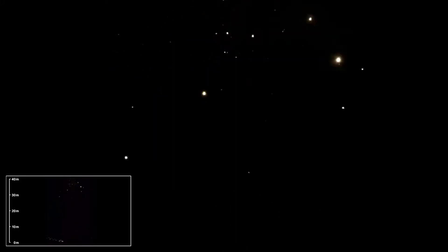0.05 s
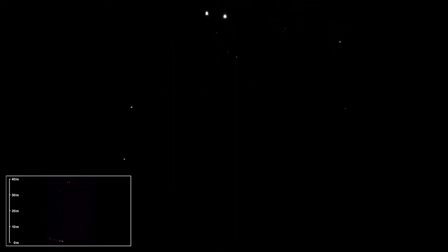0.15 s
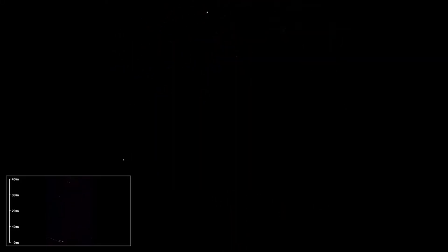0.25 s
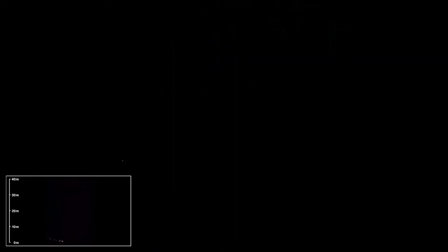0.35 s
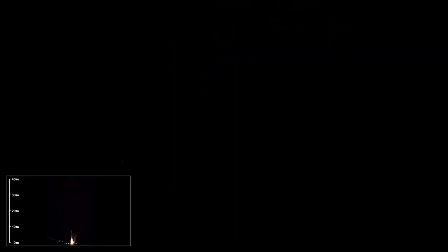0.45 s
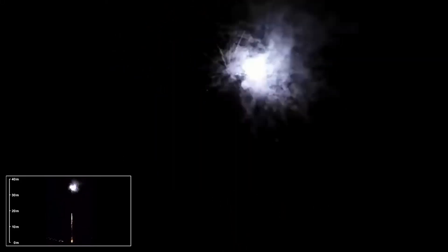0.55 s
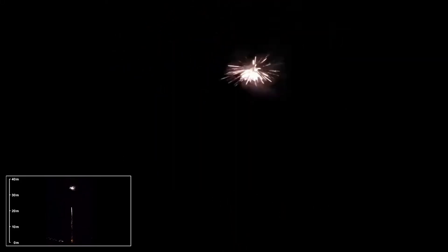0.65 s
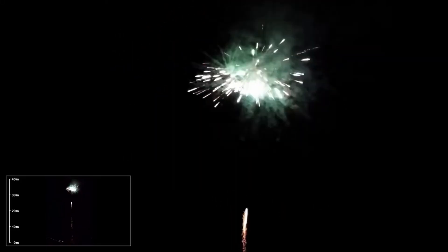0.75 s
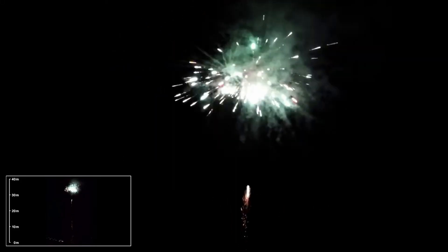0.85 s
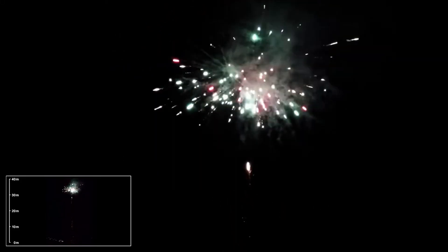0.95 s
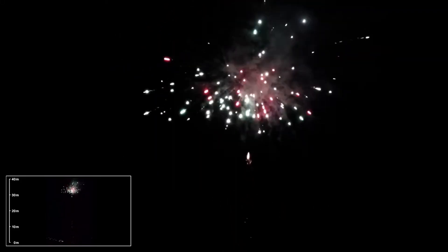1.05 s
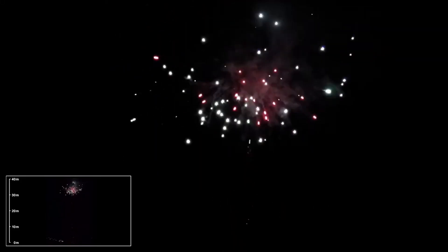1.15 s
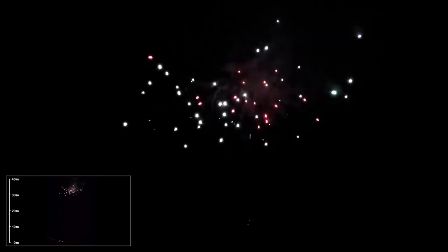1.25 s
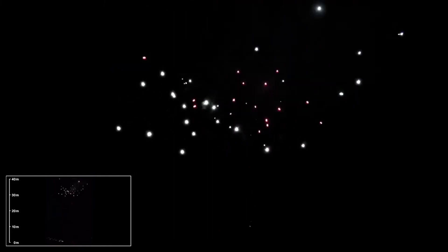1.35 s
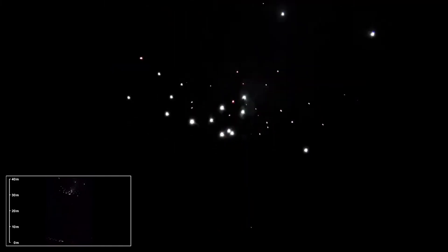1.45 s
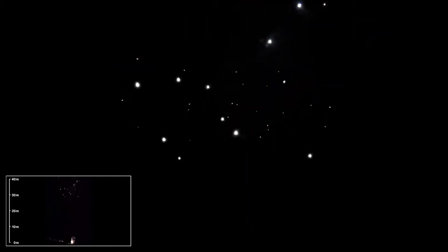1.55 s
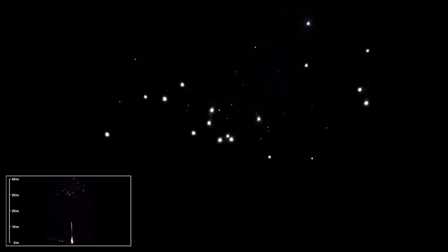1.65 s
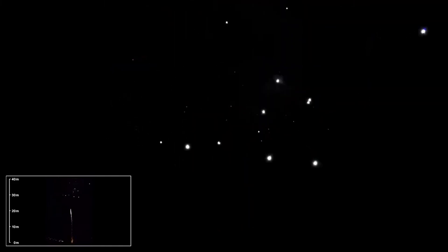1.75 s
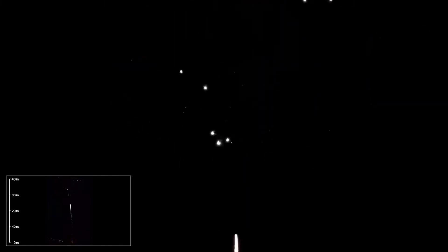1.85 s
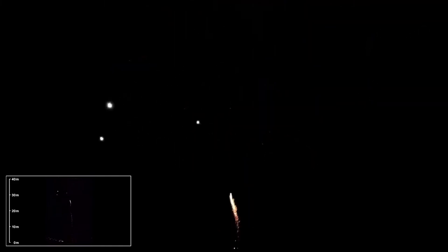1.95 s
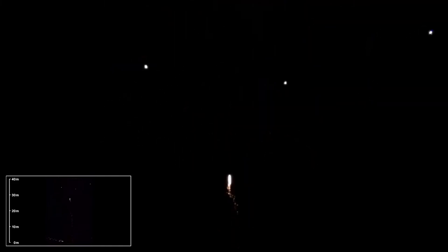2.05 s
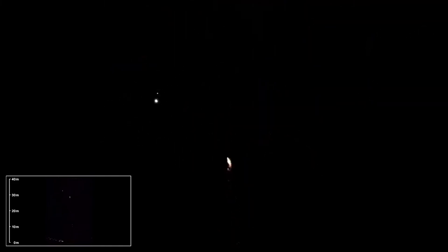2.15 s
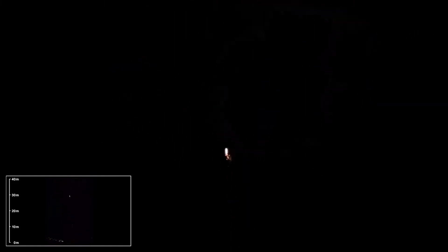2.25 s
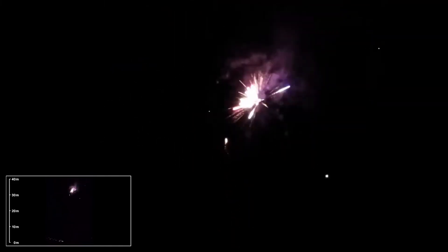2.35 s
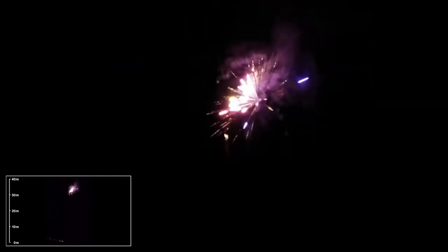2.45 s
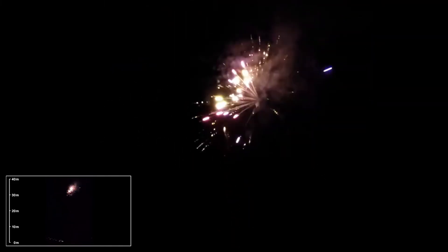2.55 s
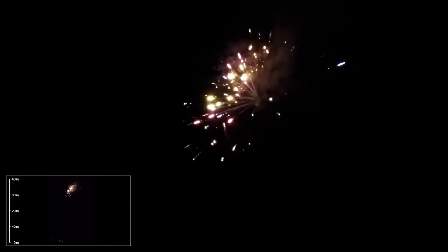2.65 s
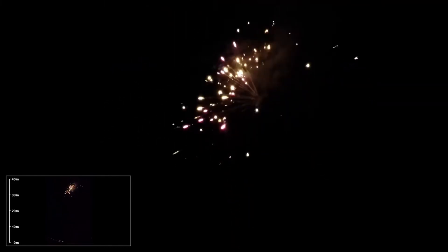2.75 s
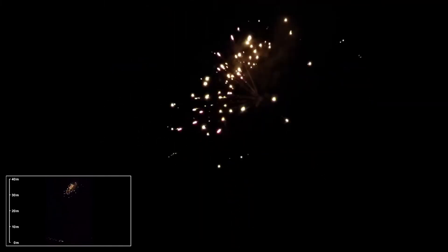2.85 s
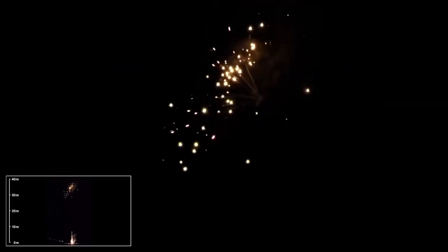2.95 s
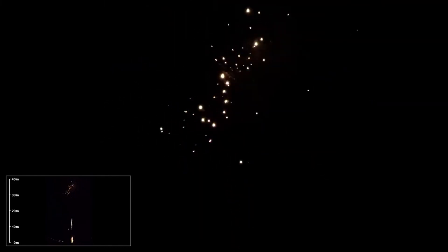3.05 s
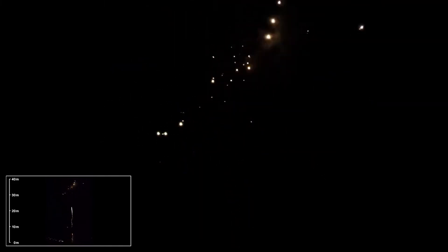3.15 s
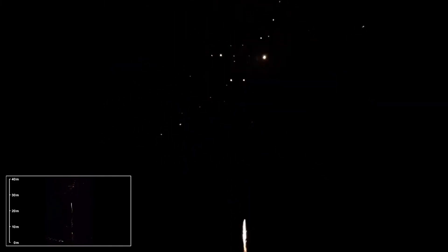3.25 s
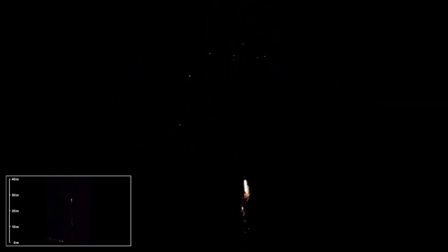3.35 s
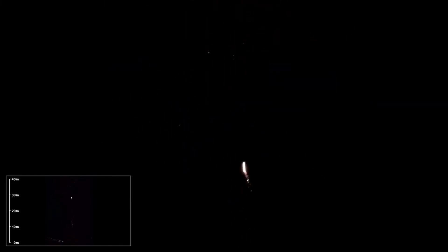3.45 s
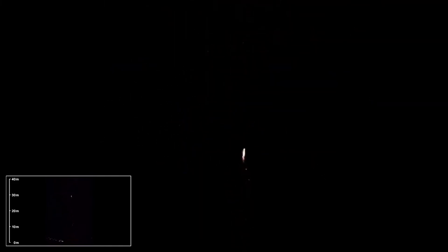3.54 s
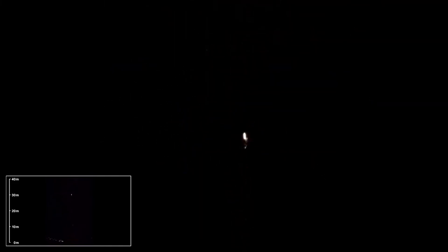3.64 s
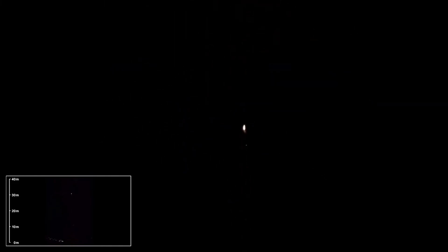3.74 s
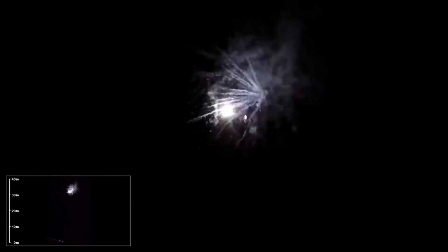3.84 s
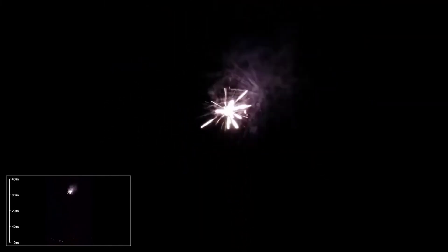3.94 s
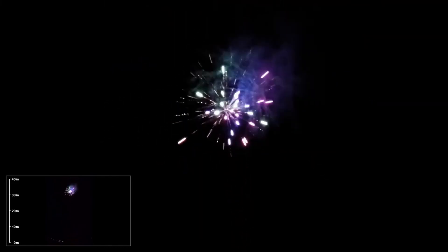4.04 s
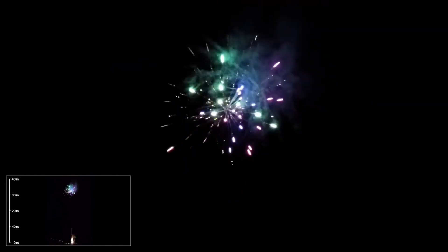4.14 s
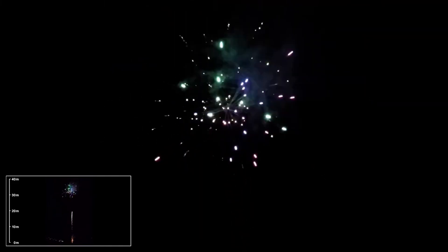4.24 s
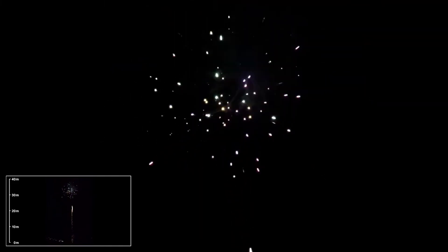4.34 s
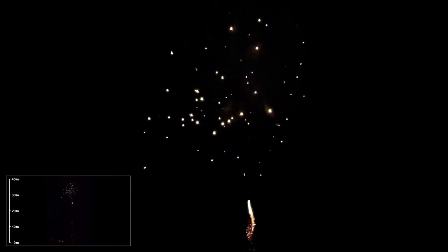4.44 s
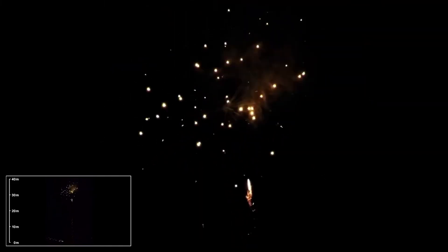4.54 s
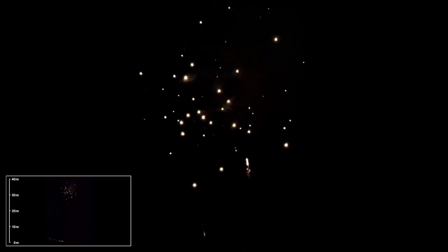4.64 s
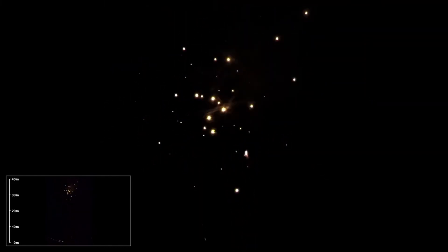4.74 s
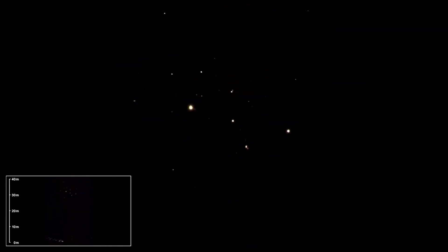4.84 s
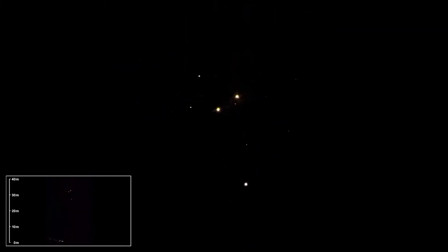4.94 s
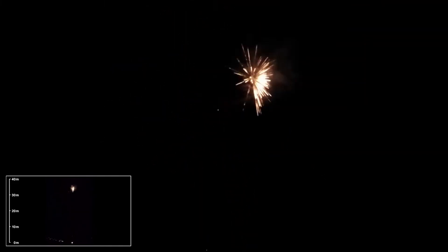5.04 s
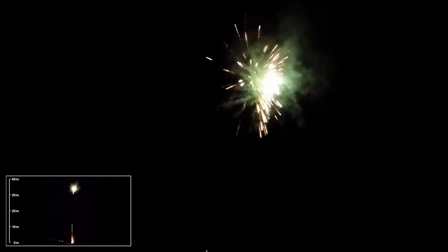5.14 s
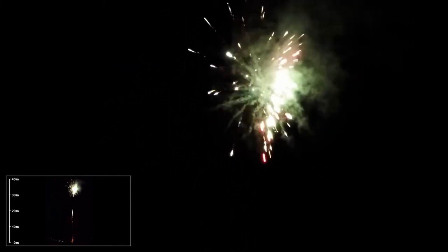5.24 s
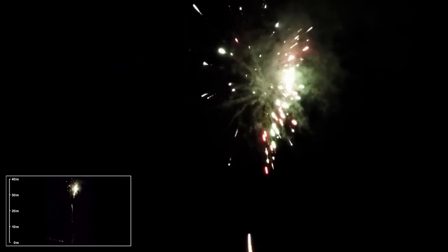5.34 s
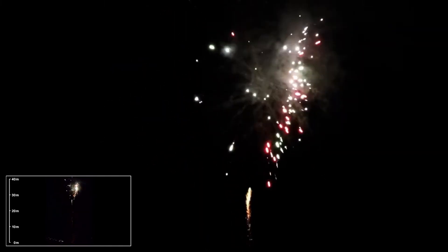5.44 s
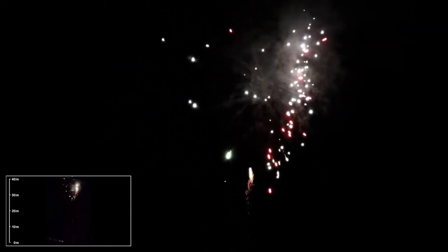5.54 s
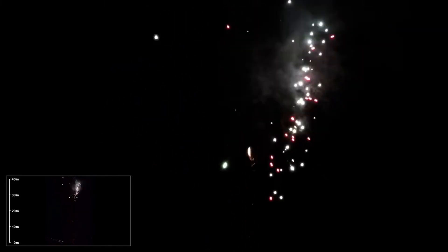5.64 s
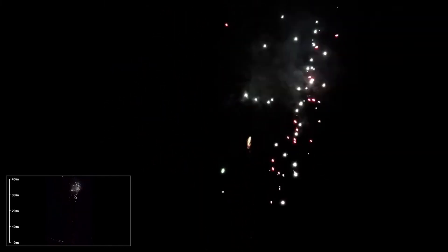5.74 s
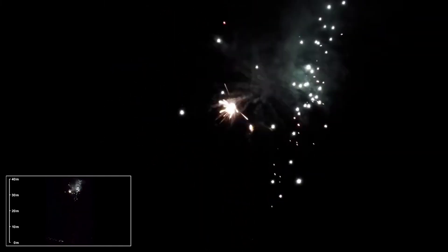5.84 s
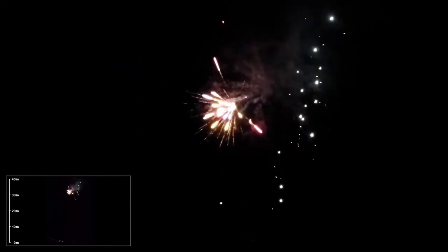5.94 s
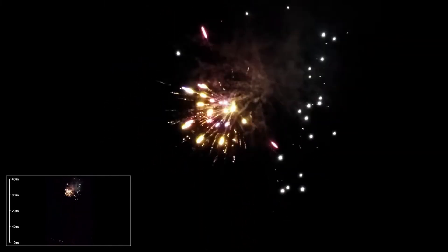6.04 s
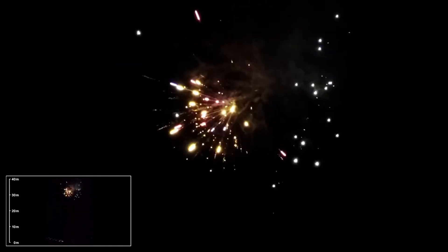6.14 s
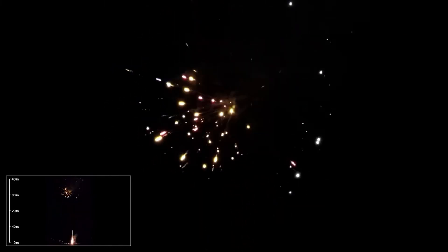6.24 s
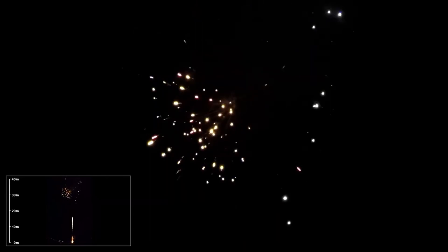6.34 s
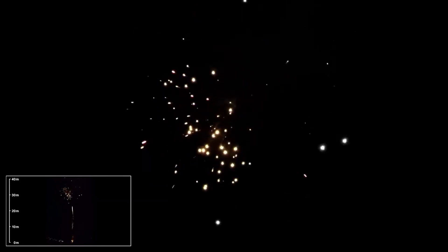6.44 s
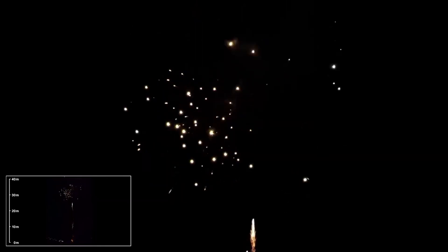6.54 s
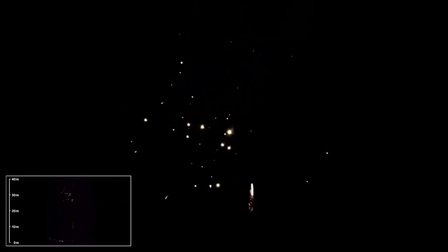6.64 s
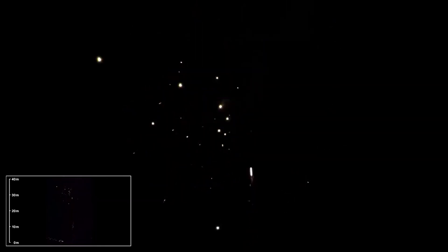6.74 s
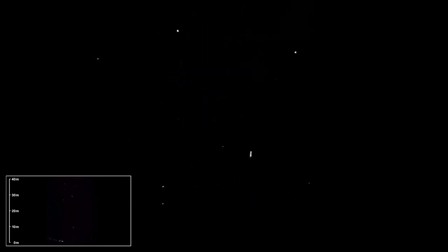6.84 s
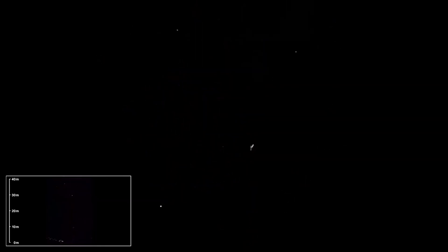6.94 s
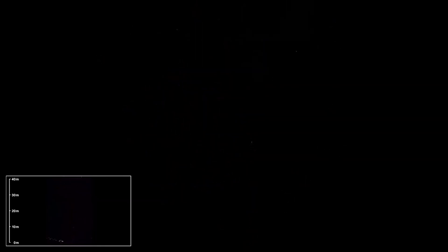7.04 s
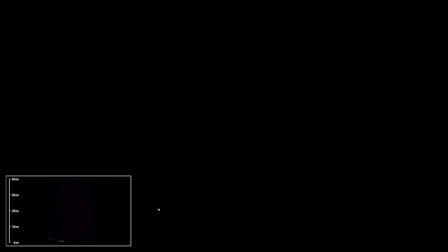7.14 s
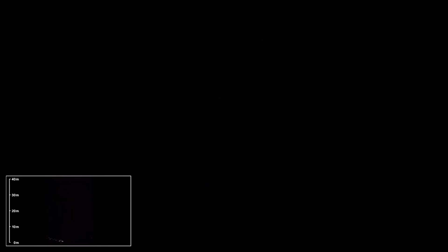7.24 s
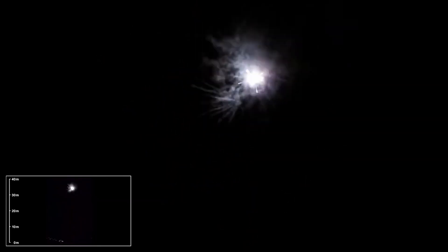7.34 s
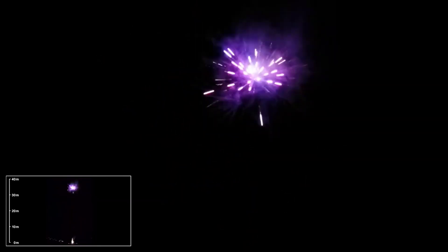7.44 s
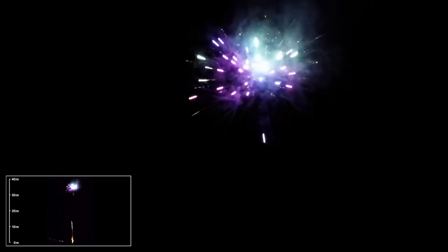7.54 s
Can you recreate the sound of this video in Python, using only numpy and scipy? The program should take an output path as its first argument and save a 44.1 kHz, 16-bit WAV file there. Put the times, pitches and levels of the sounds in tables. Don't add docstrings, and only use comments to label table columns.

```python
import sys
import numpy as np
from scipy import signal
from scipy.fft import rfft, irfft
from scipy.io import wavfile
from scipy.ndimage import uniform_filter1d

SR = 44100
rng = np.random.default_rng(int(sys.argv[2]) if len(sys.argv) > 2 else 0)


def to_wav(s):
    ch = np.atleast_2d(s).T
    pcm = np.round(np.clip(ch, -1, 1) * 32767)
    wavfile.write(sys.argv[1], SR, pcm.astype(np.int16))


def volts(x):
    e = np.asarray(x, float) / 20
    return 10 ** e


N = 334719

# (time [s], ring level [dB], pressure swing level [dB], swing time [ms], swing damping)
LIFTS = [
    (0.50029, 21.2, 29.5, 2.23, 0.91),
    (1.65682, 18.7, 25.4, 2.57, 1.16),
    (3.02992, 18.8, 27.2, 3.04, 1.66),
    (4.17413, 18.0, 21.4, 4.44, 1.3),
    (5.15682, 15.4, 19.0, 3.12, 1.25),
    (6.30667, 13.8, 21.0, 4.21, 1.37),
    (7.54065, 13.9, 21.8, 4.33, 1.43),
]
# (time [s], ring level [dB], pressure swing level [dB], swing time [ms], swing damping)
BURSTS = [
    (0.78742, 18.5, 14.2, 4.39, 1.23),
    (2.46665, 23.5, 16.5, 2.79, 0.77),
    (4.06855, 22.2, 14.6, 2.8, 0.77),
    (5.17317, 17.9, 16.0, 3.82, 1.34),
    (6.00549, 19.9, 14.5, 2.6, 0.8),
    (7.53007, 19.9, 8.1, 3.05, 0.6),
]
# (pitch [Hz], decay [ms], start angle [rad], share)
LIFT_RING = (839, 1.951, -1.475, .557, 1.029, -.62), (195.5, 1.5, 3.53, 1)
BURST_RING = (780, 2.287, -1.389, 2.76, 2.152, -.135), (226, 2.425, 3.185, .606)
# (pitch [Hz], level under the ring [dB], decay [ms])
PORT = [(1120, -8, 0.16), (3940, -25, 0.99), (7610, -21.5, 1.0), (10535, -17, 0.6), (14470, -35, 0.49)]
LIFT_FRONT_DB, BURST_FRONT_DB = -1, -16
# (pitch [Hz], width [Hz], level under the ring [dB], t60 [s])
NEAR_SCATTER = [(131, 84, -54.5, 0.23), (458.4, 92, -34.5, 0.077), (716, 290, -31.5, 0.07),
                (1406, 440, -34.5, 0.04), (2175, 2700, -48, 0.1), (3390, 730, -29, 0.017),
                (6960, 6000, -51, 0.056)]

WALL_DB = (-3, -3, -7, -11, -6, -8)
WALL_LAG_MS = 235.05
# (lag [s], level under the wall echo [dB], pitch [Hz], width [Hz])
CLICKS = [(.055, -33, 4000, 2200), (.0555, -39, 8500, 6000), (.0785, -35.5, 4000, 2000),
          (.093, -36, 4200, 1600), (.107, -36, 3600, 2500), (.1313, -34, 3000, 900),
          (.1325, -44, 6500, 5000), (.1995, -45, 5500, 1800), (.2165, -44, 11500, 2500),
          (.2325, -34, 2600, 500), (.233, -34, 4100, 900), (.2335, -42, 10500, 3000),
          (.293, -40.5, 3800, 4800), (.3115, -33, 2300, 1400), (.366, -39, 4500, 5000),
          (.4415, -41.5, 3800, 1000), (.5795, -43, 2600, 1700), (.6055, -33, 2700, 2600)]
CLICK_T60_S = .0085
# (lag [s], level under the wall echo [dB], pitch [Hz], t60 [s])
THUDS = [(0.0596, -27.5, 292, .01), (0.1045, -30, 1440, 0.065), (.119, -28, 574, 0.017),
         (0.152, -39, 740, 0.018), (.181, -53, 550, 0.0088), (.222, -23, 454, 0.067),
         (0.241, -18.5, 547, 0.063), (.27, -16, 430, .016), (.298, -21.5, 647, 0.038),
         (0.385, -23.5, 278, 0.034), (.405, -25, 730, 0.0074)]
THUD_WIDTH = 0.52

# (time [s], peak level [dB])
ROOFS = (0.11, -10.5, -32.5), [(.345, -15), (.874, -14.5), (2.551, -8), (4.154, -8.5), (5.26, -14.5),
         (6.093, -5)]
TREES = (0.043, -4.5, -38), [(.945, -9.5), (.968, -12), (2.633, -4.5), (2.649, -5.5), (4.231, -14),
         (4.26, -14.5), (5.33, -10), (5.349, -14), (6.171, -2)]
FENCES = (0.16, -6, -17.5), [(2.591, -12), (2.679, -11), (2.78, -20), (6.154, -30), (6.218, -6.5),
          (6.28, -33)]
BARNS = (0.2, -9, -26), [(.193, -13.5), (1.069, -14.5), (1.205, -14.5), (2.753, -12.5), (2.885, -13),
         (2.92, -16)]
HILL = (0.087, -5, -35), [(.116, -10.5), (1.561, -11.5), (4.82, -21.5), (5.945, -15)]
RAGGED_DB = 3.2

ROAR_EDGES_HZ = (25, 350, 1150, 2300, 3200, 6500, 15800)
# (frequency [Hz], level per Hz [dB])
ROAR_COLOUR = [(22, -17), (60, -8), (200, -10), (420, -3), (520, 0), (820, -0.5), (1000, -10), (1400, -22),
               (2200, -32.5), (3100, -37), (4300, -38), (5500, -48), (10500, -54.5), (15500, -61.5)]
ROAR_GRAIN_DB = (3.1, 1.77, 1.5, 1.5, 1.63, 1.6)
CRACKLE_DB, SWELL_DB = 1.5, 1.3
HISS_DB = -74
# (lag [s], level [dB])
LIFT_FIELD = [(.04, -35), (.17, -42), (.23, -31.5), (.4, -34), (.65, -39), (.9, -36), (1.08, -32),
              (1.25, -36.5), (1.8, -54)]
# (lag [s], level [dB])
BURST_FIELD = [(.04, -30.5), (.1, -37), (.17, -20), (.22, -28), (.33, -27.5), (.55, -34.5), (.9, -43.5),
               (1.08, -40.5), (1.8, -62.5)]
# (lag [s], level [dB])
BURST_LEAVES = [(.04, -27), (.09, -33), (.13, -22.5), (.18, -21.5), (.26, -27), (.38, -28), (.6, -35.5),
                (1.0, -33.5), (1.8, -51)]
LEAVES_FROM_BAND = 2
# (offset after a lift [dB], offset after a burst [dB], loss per second of travel [dB/s],
# loss past the near trees [dB], night floor [dB])
FIELD_BANDS = [(-0.5, -6, 3, 0.7, -44.5), (1.03, 0.35, -0.28, 0, -37), (-12, -18.5, 5, -0.5, -51),
               (-21.5, -26.5, 1.15, 2.3, -72.5), (-16, -19.5, 12.5, 1.5, -72.5),
               (-19.5, -23.5, 42, 2.5, -90)]
NEAR_TREES_END_S = 0.375
EARLIER_LIFT_S, EARLIER_BURST_S, EARLIER_DB = -.67, -.655, 2.5

DUCK_DB = (-.5, 1.5, -3.5, -4.5, -2, 0, -4.5, 0, -10.5, -15, -5.5, 0.5, -6, -12, -2)
RECOVER_S = 1.92
QUICK_DUCK_DB, QUICK_RECOVER_S = -4, 0.18
LOOK_AHEAD_S, LOOK_AHEAD_DB = 0.036, -5.5
ECHO_TOP_HZ, TOP_HZ = 15100, 16200
# (from [Hz], to [Hz], gate level [dB])
TOP_BANDS = [(11900, 12700, -95), (12700, 13400, -92.5), (13400, 14300, -90), (14300, 16500, -87)]


def band(x, hz, width_hz):
    half = width_hz / 2
    high = min(np.sqrt(hz ** 2 + half ** 2) + half, 20000.)
    sos = signal.butter(2, [hz ** 2 / high, high], "bandpass", fs=SR, output="sos")
    y = signal.sosfilt(sos, x)
    return y / np.sqrt(np.mean(y ** 2))


def cut(x, hz):
    return signal.sosfiltfilt(signal.ellip(8, .1, 50, hz, fs=SR, output="sos"), x)


def add(out, s, sound):
    i = int(round(s * SR))
    n = max(min(len(sound), len(out) - i), 0)
    out[i:i + n] += sound[:n]


def uneven(count, hold):
    steps = np.repeat(rng.standard_normal(count // hold + 1), hold)[:count]
    return 1.2 * uniform_filter1d(steps, size=hold)


def puff(hz, width_hz, t60_s, rise_s, count, lumps=1):
    t = np.arange(count) / SR
    noise = band(rng.standard_normal(count + 2048), hz, width_hz)[2048:]
    return lumps * noise * (1 - np.exp(-t / rise_s)) * volts(-60 * t / t60_s)


def field_gains():
    t = np.arange(0, N, 32) / SR
    lift_times = (EARLIER_LIFT_S, *np.transpose(LIFTS)[0])
    burst_times = (EARLIER_BURST_S, *np.transpose(BURSTS)[0])
    fired = sorted([(s, False) for s in lift_times] + [(s, True) for s in burst_times])
    power = [volts(2 * row[-1]) + 0 * t for row in FIELD_BANDS]
    gain_db = 0 * t
    for (s, burst), duck_db in zip(fired, DUCK_DB):
        lag = np.maximum(t - s, 0)
        far = np.clip((lag - NEAR_TREES_END_S) / 0.024, 0, 1)
        for k, (lift_db, burst_db, loss_db, far_db, _) in enumerate(FIELD_BANDS):
            if burst:
                field = BURST_FIELD if k < LEAVES_FROM_BAND else BURST_LEAVES
            else:
                field = LIFT_FIELD
            db = np.interp(lag, *np.transpose(field)) + (burst_db if burst else lift_db)
            db = db + EARLIER_DB * (s < 0)
            power[k] = power[k] + (t > s) * volts(2 * (db - loss_db * lag - far_db * far))
        slow_duck = duck_db * np.exp(-lag / RECOVER_S)
        quick_duck = QUICK_DUCK_DB * np.exp(-lag / QUICK_RECOVER_S)
        closing = np.clip(1 + np.minimum(t - s, 0) / LOOK_AHEAD_S, 0, 1)
        gain_db = np.where(t > s, slow_duck + quick_duck, gain_db + LOOK_AHEAD_DB * closing)
    return [np.interp(np.arange(N) / SR, t, v) for v in (*np.sqrt(power), volts(gain_db))]


def roar():
    grains = uneven(N, hold=200)
    grit = volts(CRACKLE_DB * uneven(N, hold=48))
    hz = np.maximum(np.arange(N // 2 + 1) * SR / N, 1)
    colour_hz, colour_db = np.transpose(ROAR_COLOUR)
    colour = volts(np.interp(np.log(hz), np.log(colour_hz), colour_db))
    out = volts(HISS_DB) * rng.standard_normal(N)
    *sizes, gain = field_gains()
    for lo, hi, size, grain_db in zip(ROAR_EDGES_HZ, ROAR_EDGES_HZ[1:], sizes, ROAR_GRAIN_DB):
        grainy = rng.standard_normal(N) * volts(grain_db * grains)
        if lo > 1000:
            grainy = grainy * grit
        edges = np.sqrt((1 + (lo / hz) ** 12) * (1 + (hz / hi) ** 12))
        part = irfft(rfft(grainy) * colour / edges, N)
        swell = SWELL_DB * uneven(N, hold=1800)
        out = out + part / np.std(part) * size * volts(swell)
    return out * gain


def burst_echoes():
    out = np.zeros(N)
    count = 8820
    clean_start = np.minimum(np.arange(count) / (0.0089 * SR), 1)
    for (t60, low_db, bright_db), returns in (ROOFS, TREES, FENCES, BARNS, HILL):
        for s, db in returns:
            lumps = volts(RAGGED_DB * uneven(count, hold=110) * clean_start)
            mid = puff(621, 255, t60, 0.0032, count, lumps)
            low = volts(low_db) * puff(204, 217, 2.17 * t60, 0.0083, count, lumps)
            bright = volts(bright_db) * puff(3270, 1770, 0.78 * t60, 0.0039, count, lumps)
            add(out, s, volts(db - 5.5) * (mid + low + bright) / np.abs(mid).max())
    return out


def blast(ring, thud, front_db, ring_db, swing_db, swing_ms, damping):
    hz, length, angle, rise, lag, bounce = ring
    thud_hz, decay, thud_angle, share = thud
    ms = np.arange(4410) * 1000 / SR

    def housing(t):
        envelope = (1 - np.exp(-t / rise)) * np.exp(-(t / length) ** 2)
        return envelope * np.cos(2 * np.pi * hz * t / 1000 + angle)

    body = share * (1 - np.exp(-ms / rise)) * np.exp(-ms / decay)
    body = body * np.cos(2 * np.pi * thud_hz * ms / 1000 + thud_angle)
    port = sum(volts(db) * np.exp(-ms / fade) * np.sin(2 * np.pi * f * ms / 1000) for f, db, fade in PORT)
    front = volts(front_db) * port * (1 - np.exp(-(ms / 0.1) ** 2))
    u = ms / swing_ms
    laguerre = 1 - 4 * u + 3 * u ** 2 - 2 * u ** 3 / 3 + u ** 4 / 24
    swing = (1 - np.exp(-ms / 5)) * np.exp(-damping * u) * laguerre
    near = sum(volts(db) * puff(f, w, t60, 0.000656, count=4410) for f, w, db, t60 in NEAR_SCATTER)
    direct = housing(ms) + bounce * housing(np.maximum(ms - lag, 0)) + body + front
    return volts(ring_db) * (direct + near) + volts(swing_db) * swing


def shots():
    out = np.zeros(N)
    rows = [(*row, LIFT_RING, LIFT_FRONT_DB) for row in LIFTS]
    rows += [(*row, BURST_RING, BURST_FRONT_DB) for row in BURSTS]
    for s, *shape, (ring, thud), front_db in sorted(rows):
        i = int(round(s * SR))
        out[i:] *= np.exp(-np.arange(N - i) / (.0007 * SR))
        add(out, s, blast(ring, thud, front_db, *shape))
    return out


def lift_echoes():
    echo = np.zeros(SR)
    rows = [(*row, CLICK_T60_S) for row in CLICKS]
    rows += [(lag, db, hz, THUD_WIDTH * hz, t60) for lag, db, hz, t60 in THUDS]
    for lag, db, hz, width_hz, t60 in rows:
        tick = puff(hz, width_hz, t60, t60 / 15, count=4410)
        add(echo, lag, volts(db + 0.5) * tick / np.abs(tick).max())
    ms = np.arange(SR) * 1000 / SR - WALL_LAG_MS
    echo += .5 * np.exp(-(ms / 1.25) ** 2) * np.cos(2 * np.pi * .73 * ms)
    echo += .16 * np.exp(-((ms - 3) / .8) ** 2) * np.cos(2 * np.pi * .73 * (ms - 2.3))
    echo -= .5 * (ms - .4) / 1.6 * np.exp(-((ms - .6) / 1.8) ** 2)
    echo += .27 * np.exp(-(ms / .55) ** 2)
    echo = signal.sosfiltfilt(signal.butter(1, 70, "highpass", fs=SR, output="sos"), echo)
    out = np.zeros(N)
    for lift, db in zip(LIFTS, WALL_DB):
        add(out, lift[0], volts(db + 1.7) * echo)
    return out


def scene():
    echoes = lift_echoes() + burst_echoes() + roar()
    return (shots() + cut(echoes, ECHO_TOP_HZ))[None]


def band_limit(x):
    return signal.sosfilt(signal.butter(12, 16440, fs=SR, output="sos"), x)


def record(dry):
    wide = cut(np.clip(dry, -1.01, 1.01), TOP_HZ)
    spectrum = rfft(wide)
    hz = np.arange(N // 2 + 1) * SR / N
    for lo, hi, gate_db in TOP_BANDS:
        window = (np.tanh((hz - lo) / 60) - np.tanh((hz - hi) / 60)) / 2
        top = irfft(spectrum * window, N)
        block_power = uniform_filter1d(top ** 2, size=1024)[:, 512::1024]
        muted = np.repeat(block_power < volts(2 * gate_db), 1024, axis=1)[:, :N]
        wide = wide - top * uniform_filter1d(1. * muted, size=256)
    return band_limit(wide)


dry = scene()
out = record(dry)
to_wav(out)
```